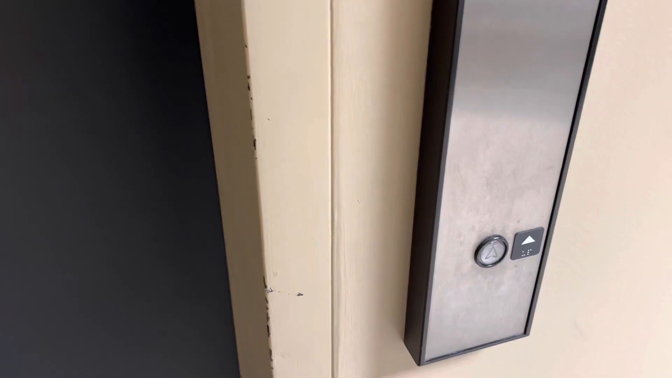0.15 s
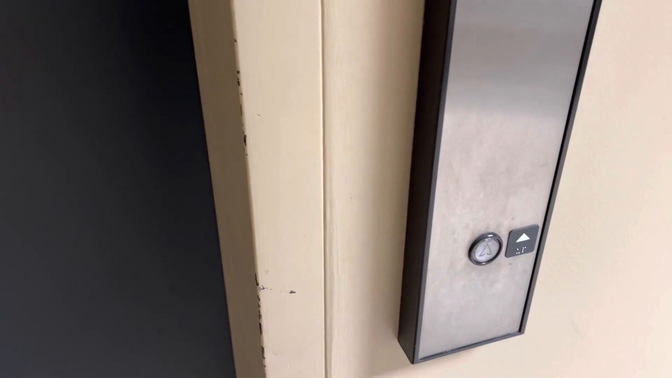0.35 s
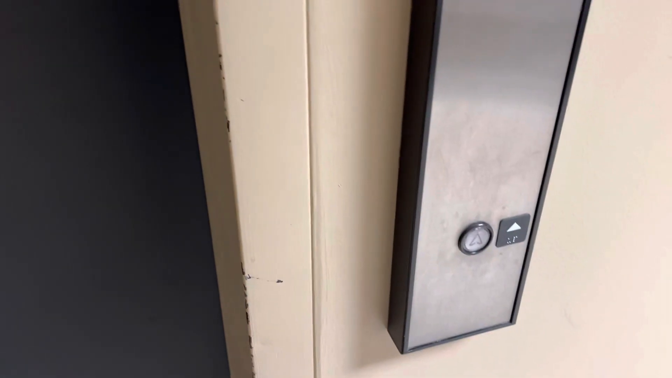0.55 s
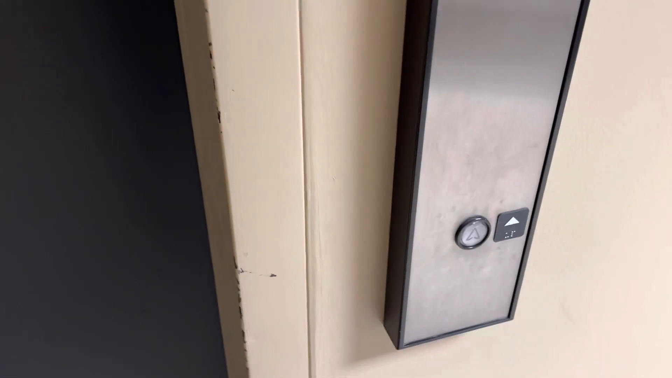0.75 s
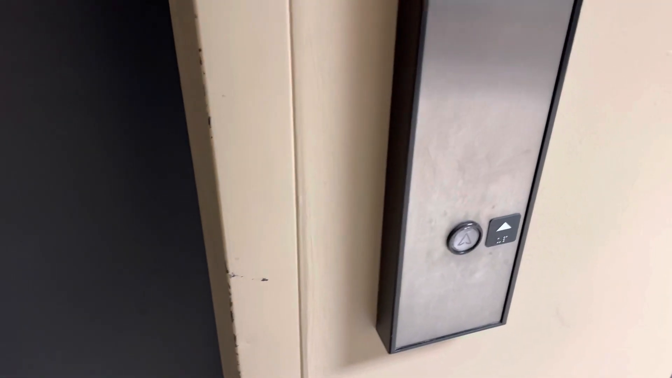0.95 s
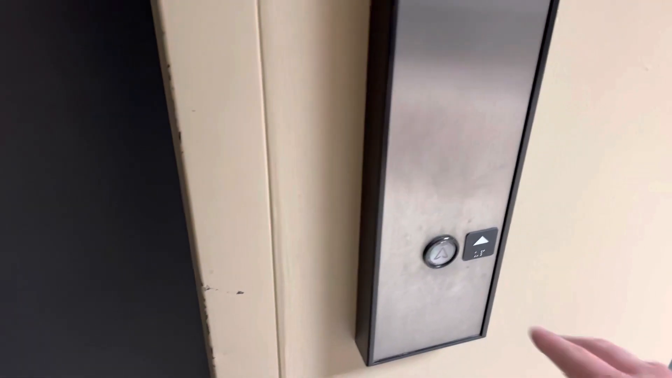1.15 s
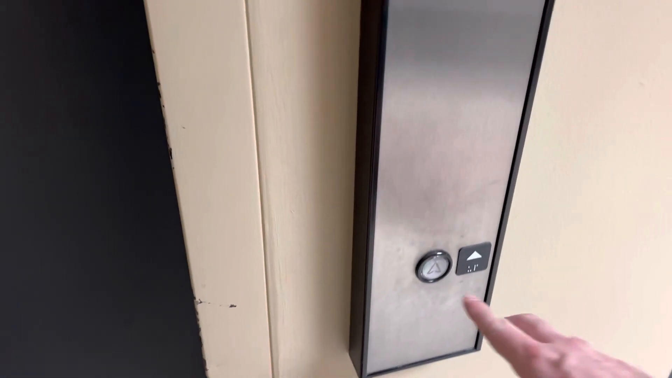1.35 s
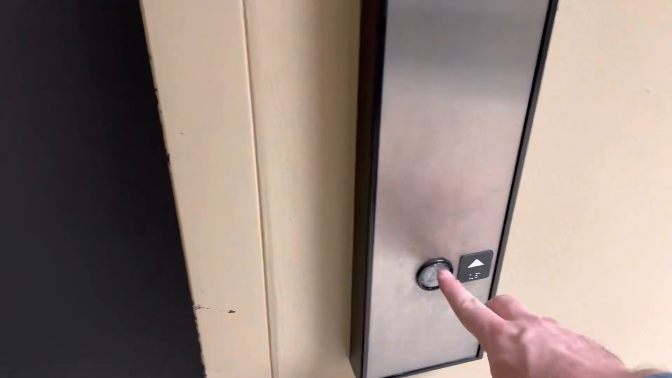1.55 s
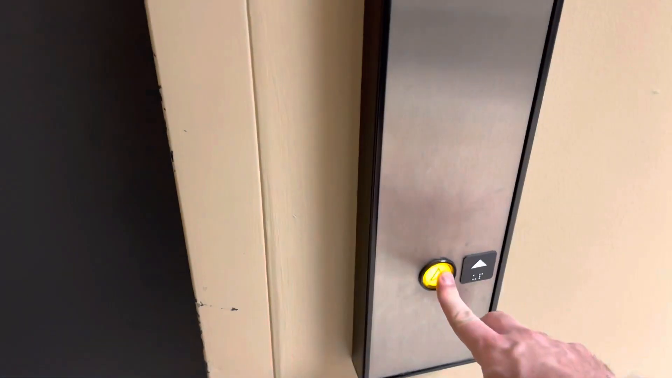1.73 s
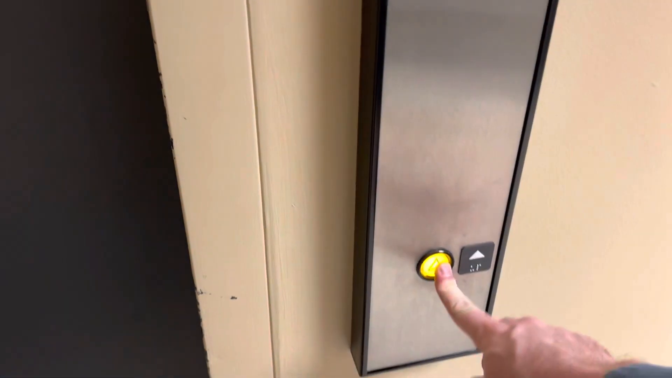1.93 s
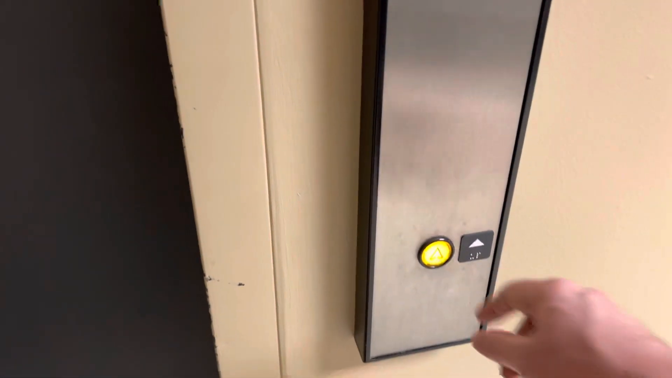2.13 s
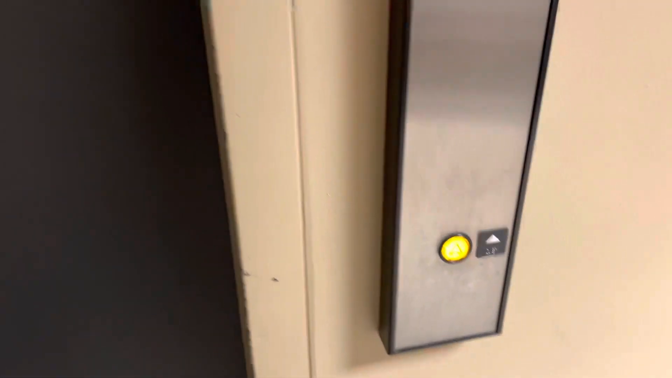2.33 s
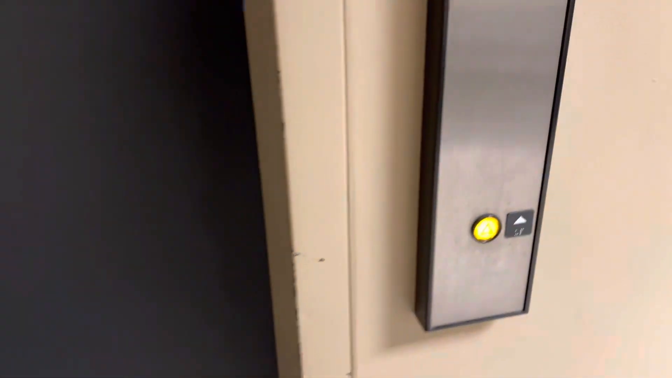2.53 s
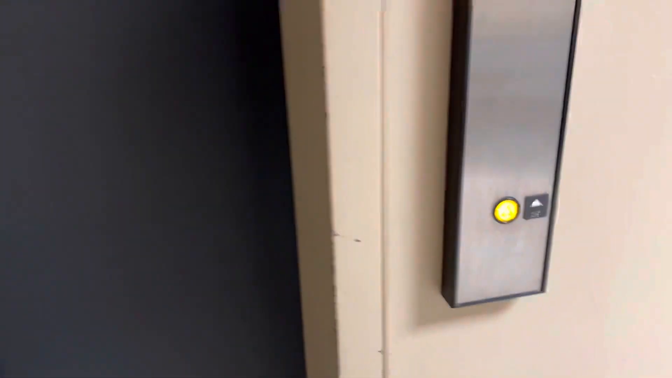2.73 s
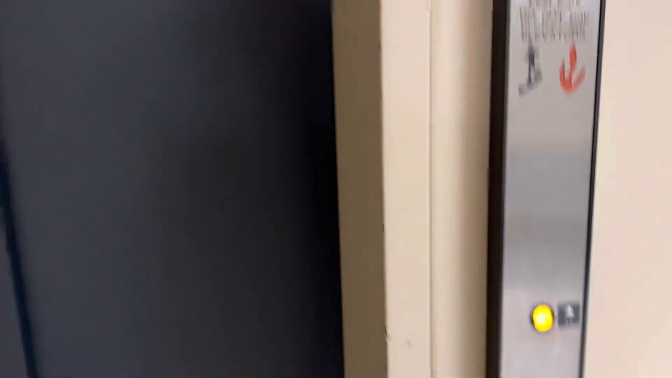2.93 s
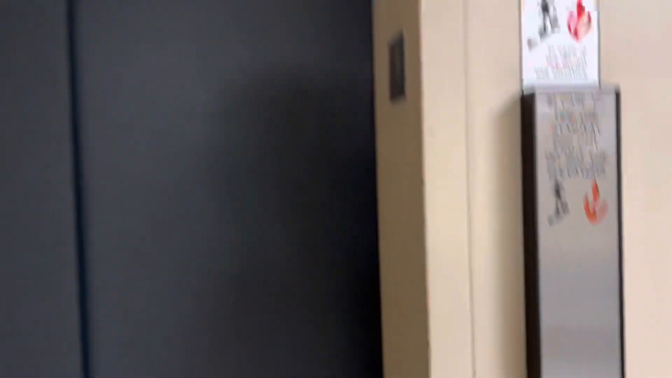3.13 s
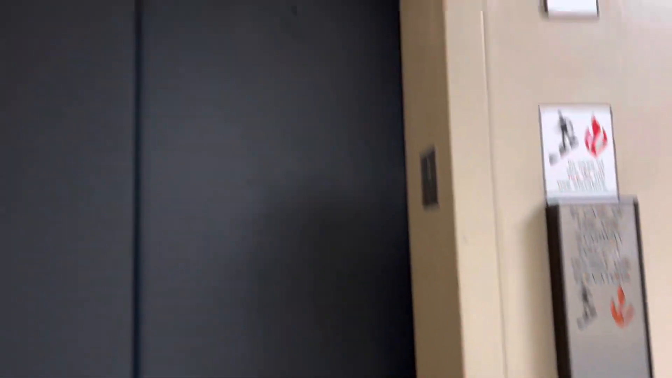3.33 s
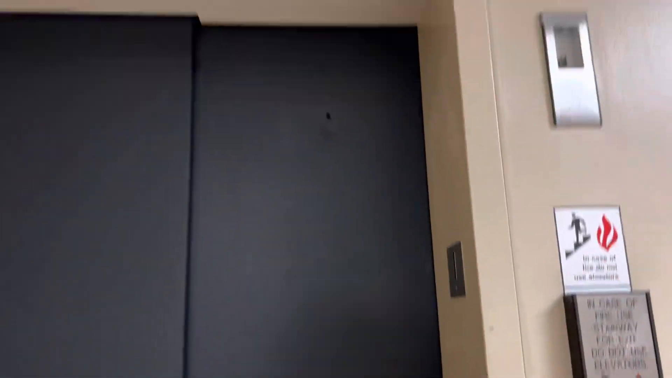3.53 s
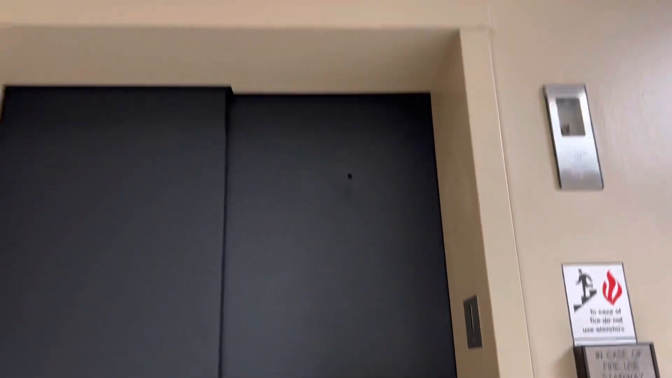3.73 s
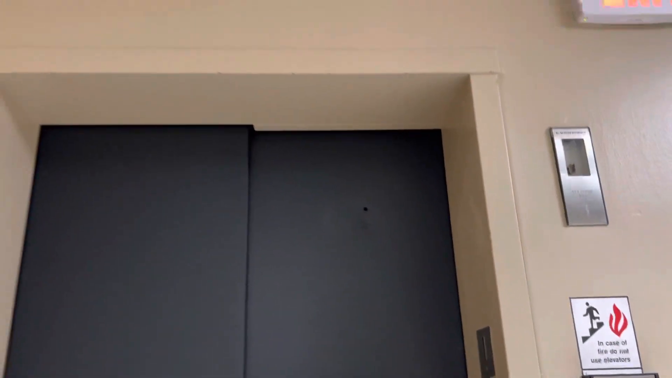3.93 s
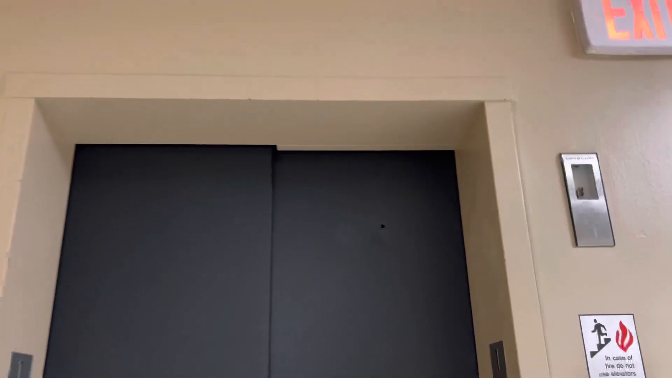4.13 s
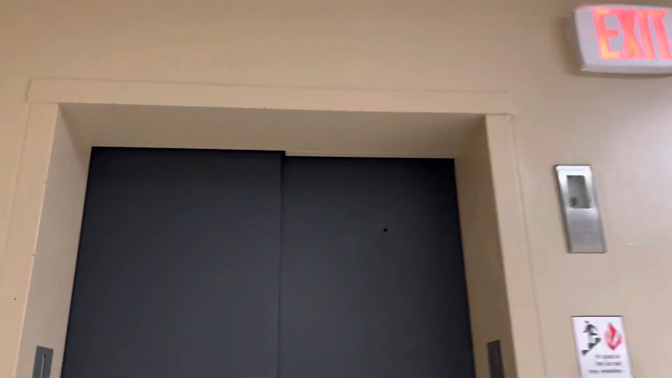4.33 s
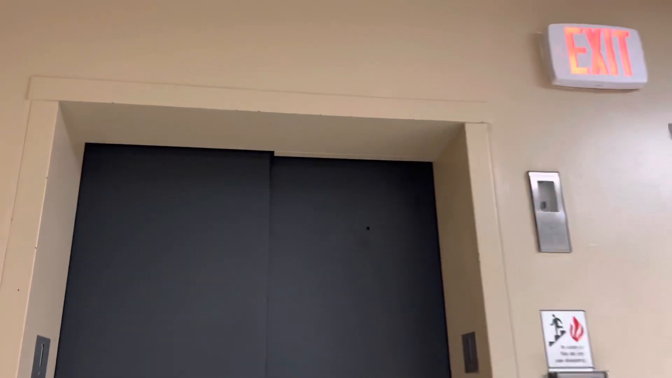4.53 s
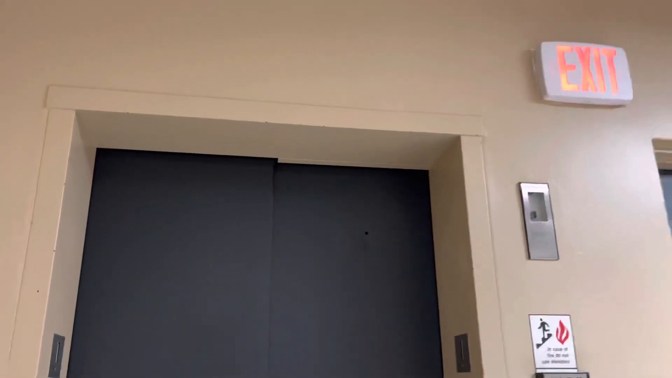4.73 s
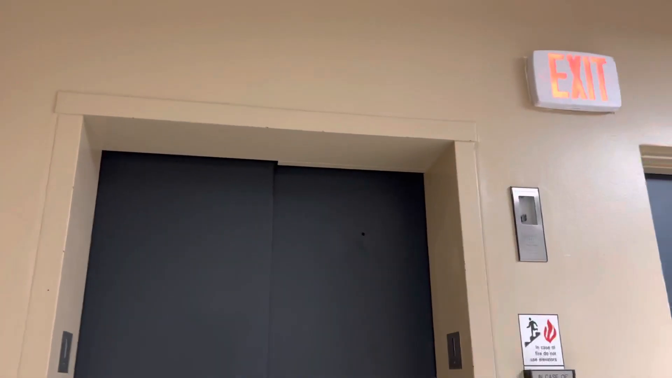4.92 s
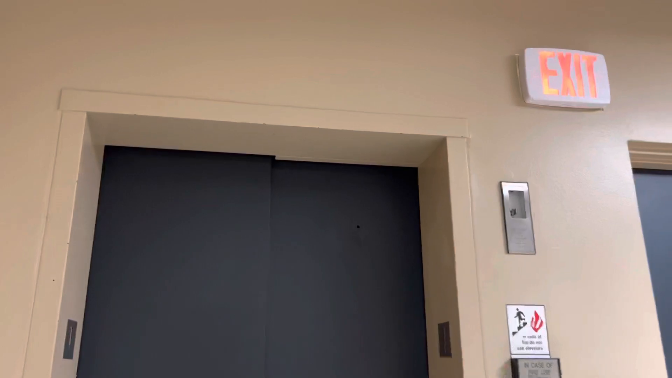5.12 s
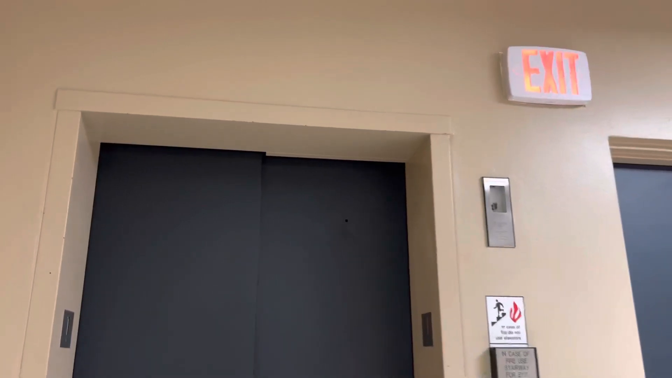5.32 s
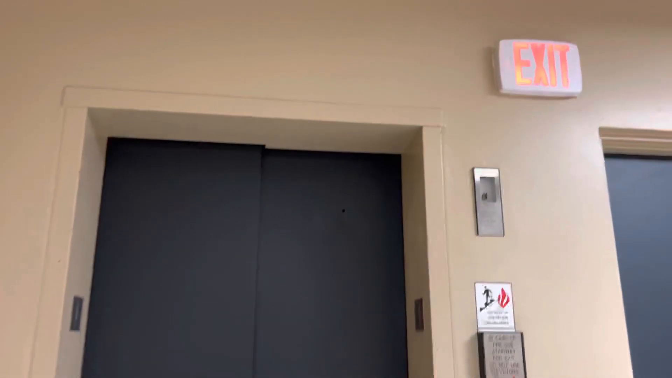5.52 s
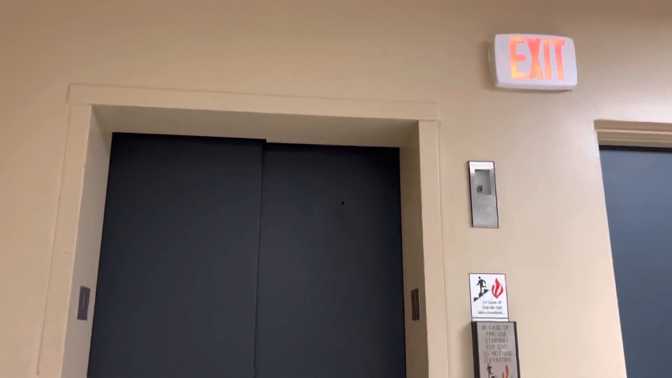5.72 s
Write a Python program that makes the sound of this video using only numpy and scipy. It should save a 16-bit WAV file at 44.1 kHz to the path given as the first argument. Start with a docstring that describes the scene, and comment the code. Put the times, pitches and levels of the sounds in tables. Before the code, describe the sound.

In a quiet hard-walled lobby, low machinery hum and soft ventilation run throughout. About a second and a half in, a finger presses a lift button close to the microphone: a bright rattly click with a dull hollow knock. Half a second later it springs back with a lighter double click. A few faint handling ticks follow, then the hum sinks as the microphone moves away and partly returns.

```python
"""A hard-walled lobby: a lift call button is pressed and let go close to a hand-held microphone pair.
Clicks are ringing panel modes with noise rattle, over the dull knock of a wall box and sparse echoes.
Machinery hums through the wall as two wavering tones; they sink, each in its own way, as the
microphone is carried from the panel through the standing waves of the lobby, and partly recover.
Behind them lie ventilation rumble and air hiss of shaped noise, faint fan tones and dry hand ticks."""
import sys
import numpy as np
from scipy import signal
from scipy.fft import rfft, irfft
from scipy.io import wavfile
from scipy.ndimage import uniform_filter1d

SR = 44100
rng = np.random.default_rng(int(sys.argv[2]) if len(sys.argv) > 2 else 0)


def materialize(psi):
    """Save the field psi as 16-bit PCM at rate SR to the path in sys.argv[1].

    A 1-D psi becomes a single channel; in a 2-D psi each row is a channel.
    """
    bounded = np.clip(np.atleast_2d(psi).T, -1, 1)
    quanta = np.round(bounded * 32767).astype(np.int16)
    wavfile.write(sys.argv[1], SR, quanta)


N = 258867

# Likeness of building noise at the two ports. Each row: frequency in Hz, left-right correlation.
LIKENESS = [(30, .97), (60, .98), (130, .92), (290, .65), (640, .1), (1400, -.1), (3100, .25), (6800, .05),
            (15000, .2)]


def gain_of(db):
    """Decibels to gain."""
    return 10 ** (np.asarray(db) / 20)


def evened(x):
    """Scales to rms 1."""
    return x / np.sqrt(np.mean(x ** 2) + 1e-20)


def read(points, hz):
    """Reads a spectrum table on a log-frequency axis."""
    f, value = np.transpose(points)
    return np.interp(np.log(hz + 1), np.log(f + 1), value)


def curve(rows):
    """Each column of a time table at every sample."""
    s, *columns = np.transpose(rows)
    return [np.interp(np.arange(N) / SR, s, c) for c in columns]


def add(mix, s, sound):
    """Mixes a sound in at s seconds."""
    part = mix[:, round(s * SR):][:, :sound.shape[1]]
    part += sound[:, :part.shape[1]]


def sides(lean_db):
    """Left and right gains for a left-minus-right level difference."""
    return gain_of([[lean_db / 2], [-lean_db / 2]])


def bump(hz, centre_hz, octaves):
    """A bell on the octave axis, 1 at its centre."""
    return np.exp(-(np.log2(hz / centre_hz) / octaves) ** 2)


def button():
    """Every contact rings the panel modes, most those near it, and shakes a short grainy rattle loose."""
    # What button and face plate ring with.
    # Each row: frequency in Hz, relative level in dB, 60 dB decay time in seconds.
    panel = [(1117, -17.5, 0.041), (1270, -20, 0.029), (1500, -15.5, 0.034), (1764, -15.5, 0.055),
             (2020, -12, 0.03), (2870, -24, 0.0069), (3106, -18, 0.045), (3306, -17.5, 0.055),
             (3565, -16, 0.044), (4100, -27, 0.049), (4700, -22, 0.12), (5150, -22, 0.046),
             (5950, -25.5, 0.088), (9560, -14, 0.021), (11140, -21, 0.022), (11600, -10.5, 0.0074),
             (12800, -15, 0.011), (14700, -15.5, .008)]
    # Contacts of plunger, spring and switch. Each row: start in seconds, blow in dB,
    # weight given to low modes in dB per octave, Hz of the modes nearest the contact, rattle in dB.
    contacts = [(1.571, -55, -2, 14000, -43), (1.5747, -40, -2.5, 15000, -44), (1.575, -28, 6, 3670, -32),
                (1.578, -50, -3, 15200, -51), (1.5807, -39, 13, 11160, -47), (1.583, -49, -3, 9100, -32),
                (1.585, -40, -5.5, 15200, -41.5), (1.588, -34.5, 10, 1450, -54),
                (1.592, -39, 9, 11600, -37), (1.5955, -53, -4, 15200, -40),
                (2.0014, -42, -6.5, 11400, -40.5), (2.002, -43.5, -2.5, 3380, -56),
                (2.0064, -46, -5, 3100, -46), (2.0097, -51, -3, 4600, -48), (2.0125, -48, -4, 13300, -38.5),
                (2.0137, -41, -3, 5700, -34.5), (2.013, -53, -3, 12000, -42), (2.017, -43.5, 8, 1720, -53),
                (2.024, -42, 1, 1580, -55)]
    # Colour of the loose rattle. Each row: frequency in Hz, relative spectral level in dB.
    rattle_colour = [(400, -50), (1100, -5), (2000, -3), (4000, -4), (7000, -11), (9000, -5.5), (10100, -1),
                     (11800, 2), (13700, -7), (15200, 0.5), (16500, -20)]
    # Button at the two ports. Each row: frequency in Hz, left minus right in dB.
    port_lean = [(60, -2), (110, 6), (200, 7), (380, 1), (700, 1), (1290, -1), (2380, 1.5), (4400, 5),
                 (8120, 1.5), (15000, -0.5)]
    # How the button reaches the ports; in the treble the left lags by a steady delay.
    # Each row: frequency in Hz, phase in radians by which the left leads.
    port_phase = [(0, 0), (3000, 1.0), (7750, 1.4), (15500, -12.5), (22050, -24)]
    rattle_t60, rattle_near_db = 0.023, 6.5  # s, dB
    early = 100  # samples of room for what reaches the left port first

    out, t = np.zeros((2, N)), np.arange(6000) / SR
    hz, db, t60 = np.transpose(panel)[:, :, None]
    bins = np.fft.rfftfreq(len(t), 1 / SR)
    phase = np.interp(bins, *np.transpose(port_phase))
    to_left = np.exp(1j * phase) * gain_of(read(port_lean, bins))
    for s, blow_db, weight_db, near_hz, rattle_db in contacts:
        # no two contacts strike the modes quite alike
        detune, spread = rng.standard_normal((2, len(panel), 1))
        level_db = blow_db + db + 11.0 * bump(hz, near_hz, octaves=0.31)
        level_db = level_db + 2.0 * spread - weight_db * np.log2(hz / 2000)
        off_hz = hz * (1 + .012 * detune)
        modes = gain_of(level_db - 60 * t / t60) * np.sin(2 * np.pi * off_hz * t)
        ring = modes.sum(0)

        # the rattle is brightest around the modes nearest the contact
        colour_db = read(rattle_colour, bins) + rattle_near_db * bump(bins + 1, near_hz, octaves=0.17)
        white = rfft(rng.standard_normal(len(t)))
        rattle = evened(irfft(white * gain_of(colour_db)))
        grain_db = 3 * evened(uniform_filter1d(rng.standard_normal(len(t)), size=30))
        rattle = rattle * gain_of(grain_db) * gain_of(rattle_db - 60 * t / rattle_t60)

        right = (ring + rattle) * (1 - np.exp(-t / .0002))  # soft onset
        left = irfft(rfft(right) * to_left)
        add(out, s - early / SR, np.roll([left, right], shift=early, axis=1))
    return out


def wall_box():
    """The push on the plate swells into a dull knock of decaying modes, the deepest mode last."""
    # The hollow wall box behind the plate. Each row: frequency in Hz, relative level in dB,
    # 60 dB decay time in seconds, rise time in seconds, lateness in seconds.
    box = [(198, 17, 0.081, 0.015, 0.009), (299, -5.5, 0.11, 0.0025, 0.0011),
           (343, -12, 0.11, 0.004, 0.0042), (413, 0.5, 0.1, 0.0023, 0.00049), (554, 2, 0.027, .001, 0.0002),
           (672, -7.5, 0.11, 0.0054, 0.00322)]
    # The finger drives the button home, then it springs back in two steps.
    # Each row: start in seconds, level in dB, extra dB of the deepest mode.
    pushes = [(1.5745, -30.5, -0.5), (2.001, -47.5, -28), (2.013, -45, -27)]
    out, t = np.zeros((2, N)), np.arange(8000) / SR
    hz, db, t60, rise, late = np.transpose(box)[:, :, None]
    t = np.maximum(t - late, 0)
    swell = gain_of(db - 60 * t / t60) * (1 - np.exp(-t / rise))
    modes = swell * np.sin(2 * np.pi * hz * t)
    for s, push_db, deep_db in pushes:
        knock = gain_of(deep_db) * modes[0] + modes[1:].sum(0)
        add(out, s, sides(1.5) * gain_of(push_db) * knock)
    return out


def hand():
    """Each faint dry tick is a quickly dying sine with a soft onset."""
    # Ticks from the hand on the case. Each row: start in seconds, level in dB, frequency in Hz,
    # 60 dB decay time in seconds, left minus right in dB.
    ticks = [(0.2735, -54, 11500, .0055, 0), (1.3452, -46, 11800, .0055, -5),
             (3.3245, -53, 11900, .0055, -4), (2.375, -42, 1500, .012, 1), (2.3755, -44, 2000, .012, 0),
             (2.3762, -45, 2450, .022, -2)]
    out, t = np.zeros((2, N)), np.arange(1500) / SR
    for s, db, hz, t60, lean_db in ticks:
        envelope = gain_of(db - 60 * t / t60) * (1 - np.exp(-t * hz / 3.5))
        add(out, s, sides(lean_db) * envelope * np.sin(2 * np.pi * hz * t))
    return out


def lobby(x):
    """Echoes: sparse taps of random sign, one per 20 samples, each band dying at its own speed."""
    # Echoes off the hard walls. Each row: frequency in Hz, 60 dB decay time in seconds.
    echo_decay = [(200, .22), (1000, .2), (5000, .26), (8000, .2), (11500, .11), (15000, .08)]
    taps = np.zeros((2, SR // 2))
    at = np.arange(200, SR // 2 - 20, 20)
    at = at + rng.integers(0, 20, (2, len(at)))
    np.put_along_axis(taps, at, rng.choice([-1., 1.], at.shape), 1)
    hz, t, z = signal.stft(taps, SR, nperseg=256)
    decay = gain_of(-60 * t / read(echo_decay, hz)[:, None])
    tail = signal.istft(z * decay, SR, nperseg=256)[1]
    return signal.fftconvolve(x, tail / np.linalg.norm(tail[0]), axes=1)[:, :N]


def hum():
    """Machinery through the wall: two low tones that waver a little, nearly alike at both ports."""
    # The two strong hum tones: lower and upper frequency in Hz.
    tone_hz = (87.86, 119.5)
    # Their level where the microphone is. Each row: time in seconds, lower tone in dB, upper tone in dB.
    tone_levels = [(0.05, -36.5, -38), (2.45, -36.5, -38.5), (2.8, -39.5, -39), (3.45, -42, -49.5),
                   (3.9, -48.5, -69), (4.2, -70, -50), (4.7, -77, -44.5), (5.2, -47, -45),
                   (5.86, -49.5, -48)]
    out, t = np.zeros((2, N)), np.arange(N) / SR
    coarse = t[::64]
    rates = np.geomspace(.5, 8, num=24)[:, None]  # Hz of the slow wavering
    for hz, db, lean_db, waver in zip(tone_hz, curve(tone_levels), (.3, 3.), (.1, .25)):
        phases = rng.random((2, 24, 1))
        slow = [evened(np.sin(2 * np.pi * (rates * coarse + p)).sum(0)) for p in phases]
        a, b = (np.interp(t, coarse, x) for x in slow)
        turn = 2 * np.pi * hz * t + [[0], [.25]]  # the ports sit at slightly different phase
        tone = (1 + waver * a) * np.sin(turn) + waver * b * np.cos(turn)
        out += sides(lean_db) * gain_of(db) * evened(tone)
    return out


def diffuse(spectrum, size, patchy_db):
    """Noise from all round: random short-time spectra with drifting patches, partly alike left and right."""
    # Lean of the noise between the ports. Each row: frequency in Hz, left minus right in dB.
    noise_lean = [(60, .5), (130, 1.5), (400, .8), (2400, 1), (4400, 4), (8000, 4), (12000, 0)]
    frames, hz = 4 * N // size + 5, np.fft.rfftfreq(size, 1 / SR)
    a, b, c, d, patches = rng.standard_normal((frames, len(hz), 5)).T
    patches = uniform_filter1d(patches, size=14, axis=0)
    patches = evened(uniform_filter1d(patches, size=10, axis=1))
    same = np.clip(read(LIKENESS, hz), -1, 1)[:, None]
    left, other = a + 1j * b, c + 1j * d
    z = np.array([left, same * left + np.sqrt(1 - same ** 2) * other])
    half_lean_db = read(noise_lean, hz)[:, None] / 2
    level_db = read(spectrum, hz)[:, None] + patchy_db * patches
    z *= gain_of(level_db + np.array([half_lean_db, -half_lean_db]))
    out = signal.istft(z, nperseg=size, noverlap=3 * size // 4)[1][:, :N]
    return out / np.std(out.mean(0))


def narrow(hz, width_hz):
    """A wavering tone: slow complex noise around a steady part, shifted up to hz."""
    bins = np.fft.fftfreq(N, 1 / SR)
    white = rng.standard_normal(N) + 1j * rng.standard_normal(N)
    slow = np.fft.ifft(white * np.exp(-(bins / width_hz) ** 2))
    slow = 6 / width_hz + slow / np.sqrt(np.mean(abs(slow) ** 2))  # narrower tones are steadier
    return evened((slow * np.exp(2j * np.pi * hz * np.arange(N) / SR)).real)


def ventilation():
    """Noise rumble, hiss and fan tones; rumble and tones change level as the microphone leaves the panel."""
    # Where the microphone is. Each row: time in seconds, share of the way from the panel.
    walk = [(0, 0), (2.5, 0.12), (3.7, 1), (5.87, 0.27)]
    # Colour of the rumble. Each row: frequency in Hz, relative spectral level in dB.
    rumble = [(25, -16), (35, -27.5), (50, -14.5), (75, -20.5), (105, -16.5), (140, -20), (200, -29),
              (300, -27.5), (450, -33.5), (660, -39.5), (850, -36.5), (1050, -41), (1300, -47.5),
              (1800, -49), (3000, -57.5), (4500, -120)]
    # Level of the rumble: near the panel in dB, away from it in dB.
    rumble_near_db, rumble_far_db = (-43.5, -42)
    # Colour of the air hiss. Each row: frequency in Hz, relative spectral level in dB.
    air = [(760, -30), (1300, -5), (1620, -5), (2520, -2), (3240, -5), (4200, -12), (5260, -9), (6000, -13),
           (7200, -16), (8700, -20), (10200, -42), (11200, -29), (12600, -31), (13400, -58), (14900, -48),
           (15600, -70)]
    # Fainter fan tones. Each row: frequency in Hz, width in Hz, dB near the panel, dB away from it.
    fan_tones = [(59, 8, -49, -54), (177, 3, -54, -62), (253, 10, -64, -58), (328, 22, -60, -61),
                 (905, 9, -70, -72), (945, 6, -67, -70), (812, 5, -74, -75), (1675, 5, -81, -78),
                 (4290, 6, -83, -86)]
    away, = curve(walk)
    rumble_db = rumble_near_db + away * (rumble_far_db - rumble_near_db)
    out = gain_of(rumble_db) * diffuse(rumble, size=4096, patchy_db=2.5)
    out += gain_of(-64) * diffuse(air, size=1024, patchy_db=1.9)
    for hz, width_hz, near_db, far_db in fan_tones:
        one, other = narrow(hz, width_hz), narrow(hz, width_hz)
        same = np.clip(read(LIKENESS, hz), -1, 1)
        pair = np.array([one, same * one + np.sqrt(1 - same ** 2) * other])
        out += gain_of(near_db + away * (far_db - near_db)) * pair
    return out


def scene():
    """Close clicks, knock and ticks with their lobby echoes, over the building noise."""
    close = button() + wall_box() + hand()
    echoes = gain_of(-12.5) * lobby(close)
    return close + echoes + hum() + ventilation()


def record(dry):
    """The microphone drops the deepest bass, the recorder opens a moment late, then the band limit."""
    mic_low_hz, start_s, edge_hz = 24.8, .0362, 16200
    bass_cut = signal.butter(2, mic_low_hz, "high", fs=SR, output="sos")
    heard = signal.sosfilt(bass_cut, dry)
    opened = heard * np.clip((np.arange(N) / SR - start_s) / .0002, 0, 1)
    band = signal.firwin(511, edge_hz, window=("kaiser", 9), fs=SR)
    return signal.oaconvolve(opened, band[None], "same")


dry = scene()
out = record(dry)
materialize(out)
```